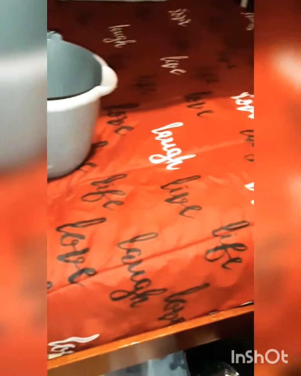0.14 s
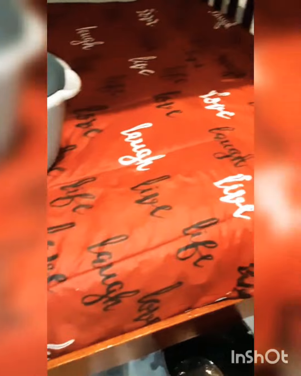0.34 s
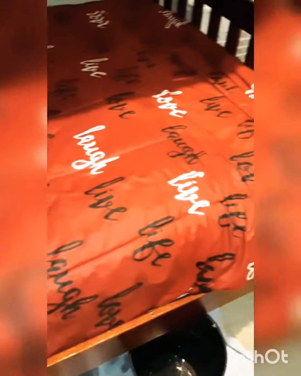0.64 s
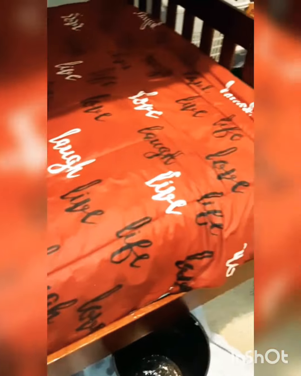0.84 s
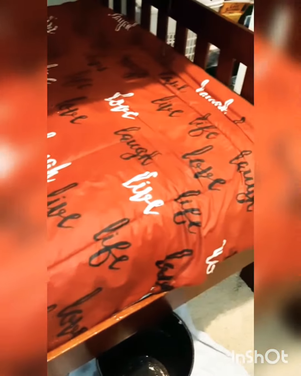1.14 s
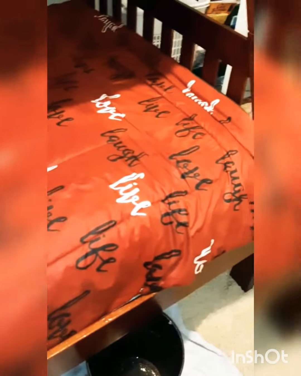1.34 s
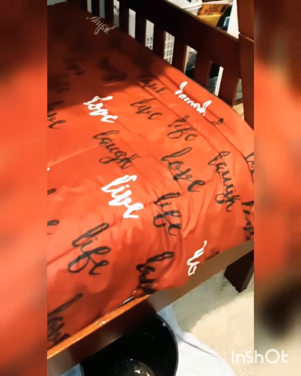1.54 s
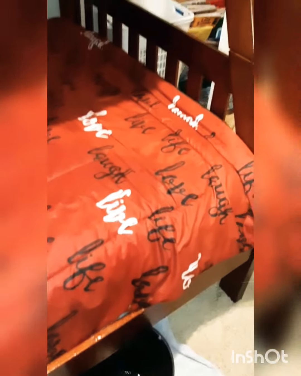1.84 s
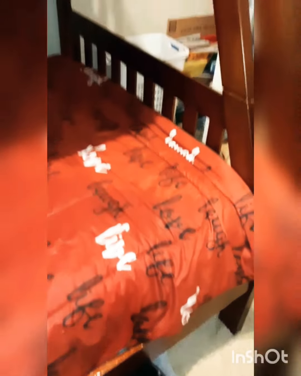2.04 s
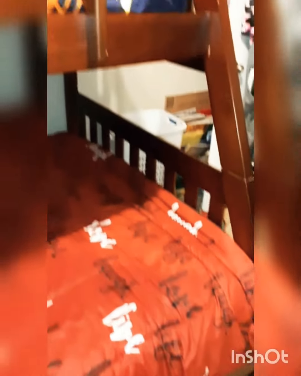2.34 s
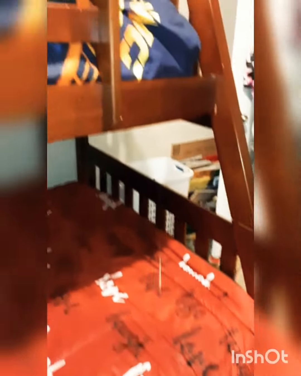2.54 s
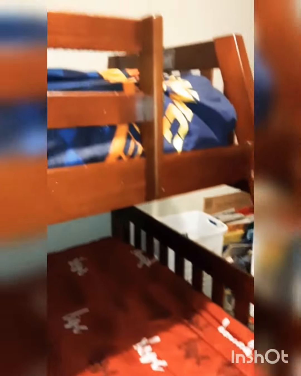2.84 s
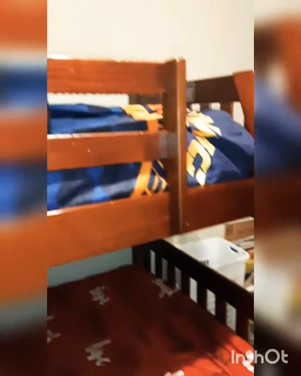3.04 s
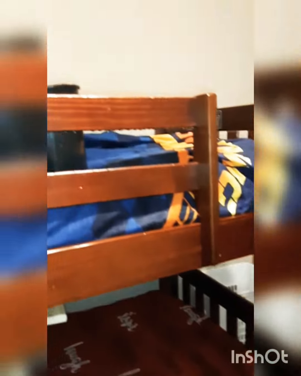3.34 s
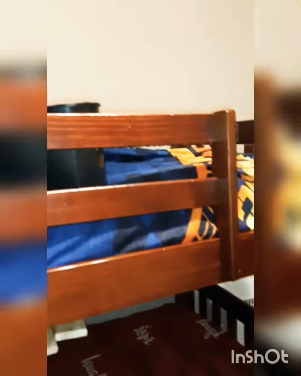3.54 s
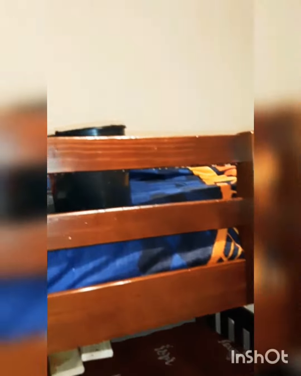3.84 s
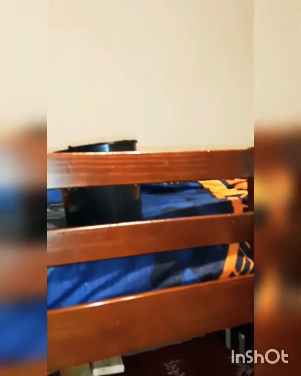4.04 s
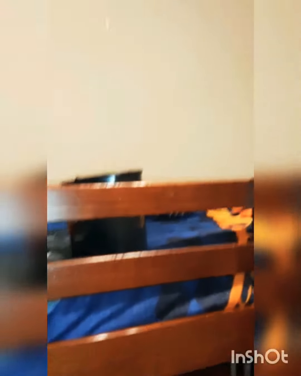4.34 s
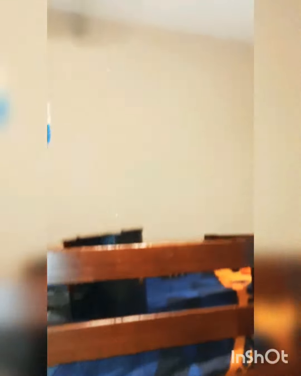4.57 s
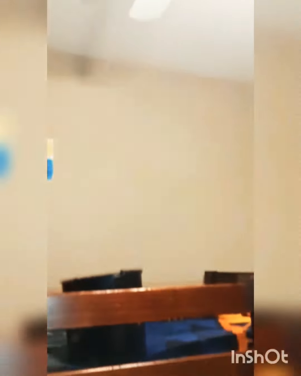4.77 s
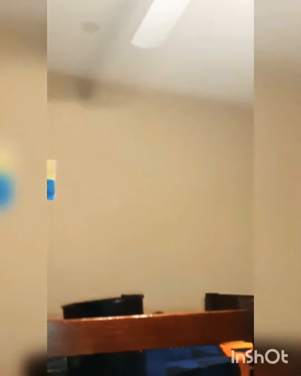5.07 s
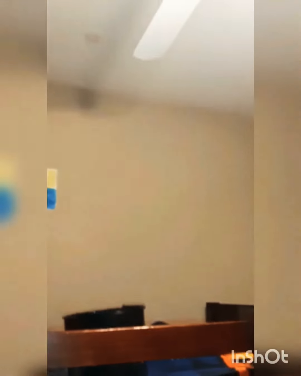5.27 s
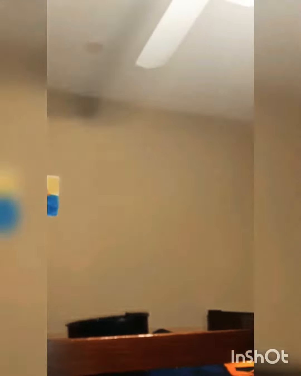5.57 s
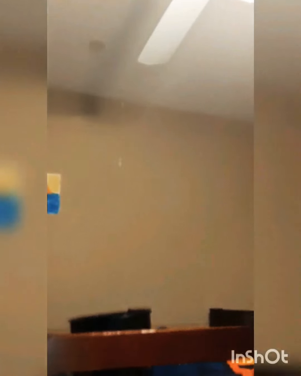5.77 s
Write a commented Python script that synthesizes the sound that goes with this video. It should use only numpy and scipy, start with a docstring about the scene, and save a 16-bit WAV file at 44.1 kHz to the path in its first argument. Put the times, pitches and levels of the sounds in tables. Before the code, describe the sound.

Water drips quickly and unevenly into plastic buckets in a small room, with sharp splashes, bubbly plinks and light ticks.

```python
"""A small bedroom with a leaking ceiling, plastic buckets under the drips, a stereo microphone in the hand.
Drops slap the water in quick, uneven succession and throw up spray; some tick on bare plastic.
Many trap an air bubble that rings and glides upward. The air in the bucket colours every drop,
and the walls answer with a short tail. A few dull knocks and close, dry taps sound over a faint hush."""
import sys
import numpy as np
from scipy import signal
from scipy.fft import rfft, irfft, next_fast_len
from scipy.io import wavfile

SR = 44100
rng = np.random.default_rng(int(sys.argv[2]) if len(sys.argv) > 2 else 0)


def bounce(signal):
    """Save signal as a 16-bit WAV file at the path given by the first command-line argument."""
    frames = np.transpose(np.atleast_2d(signal))
    limited = np.clip(frames, -1, 1)
    pcm = np.round(limited * 32767).astype(np.int16)
    wavfile.write(sys.argv[1], SR, pcm)


N = 260631
CUTOFF_HZ = 16000
ROOMY_DB, CLOSE_DB = -12.5, -0.5   # direct sound: mostly room, or almost straight into the microphone


def from_db(db):
    """Decibels to gain."""
    return 10 ** (np.asarray(db) / 20)


def unit_energy(x):
    """Scale to a mean energy of 1 per channel."""
    return x / np.sqrt(np.mean(np.sum(x ** 2, axis=-1)) + 1e-20)


def seconds(length):
    """A time axis."""
    return np.arange(int(length * SR)) / SR


def band(x, hz, octaves):
    """Band-pass around a centre."""
    edges = [hz / 2 ** (octaves / 2), min(hz * 2 ** (octaves / 2), CUTOFF_HZ)]
    return signal.sosfilt(signal.butter(3, edges, "band", fs=SR, output="sos"), x + 1e-18)


def coloured(x, spectrum):
    """Apply a smooth curve of (frequency [Hz], gain [dB])."""
    hz, db = np.transpose(spectrum)
    size = next_fast_len(N + SR // 10)
    log_hz = np.log(np.arange(size // 2 + 1) * SR / size + 1)
    gain = from_db(np.interp(log_hz, np.log(hz), db))
    return irfft(rfft(x, size) * gain, size)[:, :N]


def balance(hz):
    """Where water of this pitch sits in the stereo picture, as left-right dB."""
    # balance at the microphone: (pitch [Hz], left-right [dB])
    balance_by_pitch = [(500, 6.5), (800, -0.5), (1400, -1.5), (2600, -4), (4200, -2), (8000, -0.5),
                        (12000, -0.5)]
    pitches, db = np.transpose(balance_by_pitch)
    return np.interp(np.log(hz), np.log(pitches), db)


def room_path(s, direct_db=ROOMY_DB, early_t60_s=.12, late_t60_s=.4, build_up_s=.00048, wide_above_hz=690):
    """From one spot to the microphone at time s: direct sound, uneven near reflections, room tail."""
    # the microphone turns away from the buckets and back: (time [s], lead of the left channel [ms])
    left_lead = [(0, 0.58), (2.2, .45), (2.7, 0.35), (3.3, 0.16), (3.8, 0.082), (4.7, 0.044), (5.3, .35),
                 (5.9, 0.33)]
    t = seconds(.25)
    early = from_db(-5) * unit_energy(from_db(-60 * t / early_t60_s))
    late = from_db(-8) * unit_energy(from_db(-60 * t / late_t60_s))
    fade = np.hypot(early, late) * (1 - np.exp(-t / build_up_s))
    # reflections arrive in clumps about a millisecond long
    clumps_db = 9.5 * np.repeat(rng.uniform(-1, 1, len(t)), SR // 1000)[:len(t)]
    fade *= unit_energy(from_db(clumps_db)) * np.sqrt(len(t))
    # long waves reach both capsules alike, short ones differ
    left, other = rng.standard_normal((2, len(t)))
    hz = np.arange(len(t) // 2 + 1) * SR / len(t)
    alike = np.exp(-(hz / wide_above_hz) ** 2)
    right = irfft(alike * rfft(left) + np.sqrt(1 - alike ** 2) * rfft(other), len(t))
    response = np.array([left, right]) * fade
    lead = int(np.interp(s, *np.transpose(left_lead)) * SR / 1000)
    response[[0, 1], [0, lead]] += from_db(direct_db)
    return response


def play(events, voice, direct_db=ROOMY_DB):
    """Sound each event from a spot of its own; its level is that of its energy spread over 10 ms."""
    out = np.zeros((2, N))
    for s, db, hz, octaves, swell_s, pan_db in events:   # octaves: a splash's width or a bubble's rise
        sound = voice(hz, octaves, swell_s)
        left, right = signal.fftconvolve(room_path(s, direct_db), sound[None], axes=1)
        pan = from_db([[pan_db / 2], [-pan_db / 2]])
        heard = unit_energy(np.array([unit_energy(left), unit_energy(right)]) * pan)
        start = int(s * SR)
        heard = heard[:, :max(N - start, 0)]
        out[:, start:start + heard.shape[1]] += from_db(db) * np.sqrt(SR / 100) * heard
    return out


def room_tone(level_db=-60, side_db=-6):
    """The faint, steady hush of the bedroom."""
    # spectrum of the hush: (frequency [Hz], relative density [dB])
    hush_spectrum = [(25, -18), (55, -5), (125, 1.5), (200, -8), (400, -14.5), (800, -27.5), (2500, -6),
                     (8000, -13), (11000, -11.5), (15000, -9)]
    mid, side = rng.standard_normal((2, N))
    hush = coloured(mid + from_db(side_db) * side * [[1], [-1]], hush_spectrum)
    return from_db(level_db) * np.sqrt(N) * unit_energy(hush)


def splash(hz, octaves, swell_s, snaps_per_s=900, spread_db=5, slap_db=12.5):
    """A drop tears the surface: one slap amid a quick cluster of tiny snaps and a wet wash."""
    age = seconds(7 * swell_s + 6 / hz) / swell_s
    born = rng.random(len(age)) < snaps_per_s / SR
    snaps = born * from_db(spread_db * rng.standard_normal(len(age))) * rng.choice([-1, 1], len(age))
    snaps[int(swell_s * SR)] = from_db(slap_db)
    wash = .044 * rng.standard_normal(len(age))
    return band((snaps + wash) * age * np.exp(-age), hz, octaves)


def patter(per_s=8, level_db=-47, spread_db=5.5, low_hz=2970, high_hz=11100, width_oct=1.95):
    """Light drops: a steady leak lets go at uneven moments, each with its own strength, pitch and length."""
    events = []
    for slot, (late, strong, high, slow) in enumerate(rng.random((int(per_s * N / SR), 4))):
        db = level_db + spread_db * (2 * strong - 1)
        hz = low_hz * (high_hz / low_hz) ** high
        swell_s = .003 * 2 ** (2 * slow - 1)
        events.append(((slot + late) / per_s, db, hz, width_oct, swell_s, balance(hz)))
    return events


def drops(tick_hz=11950, tick_width_oct=1.55, tick_swell_s=.0054):
    """Heavy drops slap the water, light ones patter between them, and some tick brightly on plastic."""
    # heavy drops on water: (time [s], level [dB], centre [Hz], width [octaves], swell [s])
    water_hits = [(.026, -39.5, 6150, 2.95, .011), (.077, -45, 8750, 2.2, .0012),
                  (.107, -42, 9600, 2.4, 0.0052), (.183, -36, 7300, 1.5, .004),
                  (.375, -44, 9360, 2.6, .001), (.222, -44, 3520, 1.04, 0.0017),
                  (.272, -48.5, 5230, 0.89, .004), (.319, -49, 8950, 0.3, .007),
                  (0.407, -43, 7200, 1.3, 0.0055), (0.473, -44, 2470, .6, 0.028),
                  (.51, -41.5, 8900, 2.2, 0.0063), (.529, -41.5, 2020, 0.86, 0.0017),
                  (.58, -39.5, 7260, 1.05, 0.004), (0.739, -43, 3900, 2.6, 0.021),
                  (0.836, -39.5, 9450, 3.44, 0.0033), (0.92, -44, 5740, 1.2, 0.0099),
                  (.976, -37, 5800, 1.38, 0.0061), (1.035, -44.5, 4140, 1.1, 0.0019),
                  (1.067, -45, 4800, 2.9, 0.0016), (1.163, -43, 4800, 1.9, 0.011),
                  (1.247, -39.5, 4700, 2.25, 0.0027), (1.302, -44.5, 5900, 1.1, 0.0034),
                  (1.362, -44, 1850, 2.06, 0.016), (1.386, -35, 4960, 2.06, 0.0065),
                  (1.509, -43, 3020, 4.3, .004), (1.61, -42.5, 4130, 1.29, 0.015),
                  (1.67, -43, 4814, 1.53, 0.025), (1.819, -42, 3600, 2.85, 0.0071),
                  (1.925, -36.5, 3696, 2.4, .0055), (2.057, -42, 4614, 1.88, .008),
                  (2.188, -45, 6200, 1.45, 0.0024), (2.229, -41.5, 4425, 3.86, 0.0049),
                  (2.289, -43, 5793, 0.86, 0.0041), (2.354, -40, 5000, 1.09, .0022),
                  (2.416, -41.5, 1170, 4.1, 0.011), (2.419, -37.5, 8200, 0.97, 0.0053),
                  (2.509, -43, 4930, 2.88, 0.019), (2.638, -36.5, 3405, 3.3, 0.0052),
                  (2.728, -43, 5596, 2.83, 0.011), (2.81, -39.5, 7070, 1.24, .015),
                  (2.96, -38, 5578, 1.9, 0.015), (3.065, -37, 4650, 1.29, .0052),
                  (3.135, -40.5, 2650, 2.17, 0.012), (3.234, -41, 5172, 1.93, 0.0045),
                  (3.317, -37.5, 3200, 1.4, 0.0055), (3.443, -48.5, 3000, 1.87, 0.019),
                  (3.529, -40.5, 4363, 3.27, 0.0085), (3.68, -42.5, 3900, 1.9, .01),
                  (3.766, -40, 3195, 1.36, 0.018), (3.816, -40, 3990, 2.37, 0.0065),
                  (3.863, -35.5, 3800, 1.43, .015), (3.979, -40.5, 4050, 2.73, 0.0091),
                  (4.04, -38.5, 4798, 1.53, 0.0048), (4.073, -44.5, 1950, 2.4, .011),
                  (4.141, -43, 5976, 2.08, 0.0058), (4.16, -53, 1475, 1.89, 0.0067),
                  (4.236, -36, 3948, 0.99, 0.016), (4.261, -45, 1424, 1.7, .016),
                  (4.31, -42, 4214, 2.68, 0.0032), (4.353, -42, 3421, 3.2, 0.014),
                  (4.431, -40.5, 3715, 2.4, .006), (4.519, -42.5, 7884, 2.7, .006),
                  (4.571, -41.5, 7900, 1.26, 0.018), (4.608, -39.5, 2358, 1.16, .007),
                  (4.649, -43, 2463, 2.47, 0.0056), (4.724, -43.5, 1931, 1.76, .018),
                  (4.909, -40.5, 5000, 1.8, 0.0049), (5.011, -44, 4227, 0.98, 0.0078),
                  (5.097, -47, 2162, 3.06, 0.023), (5.129, -42.5, 9344, 1.1, 0.015),
                  (5.229, -41.5, 5400, 1.09, 0.0093), (5.246, -36.5, 1610, 1.05, .016),
                  (5.36, -40, 3635, 2.4, 0.0097), (5.451, -42, 3958, 1.54, 0.0089),
                  (5.537, -45.5, 2535, 4.2, 0.019), (5.602, -37.5, 4882, 0.61, 0.0078),
                  (5.638, -39.5, 4390, 1.4, 0.0071), (5.773, -47.5, 2157, 2.83, 0.017),
                  (5.821, -40, 3393, 1.56, 0.013), (5.88, -38.5, 12400, 3.05, 0.017)]
    # drops on bare plastic: (time [s], level [dB])
    plastic_hits = [(0.704, -48.5), (1.547, -43), (1.629, -43), (2.237, -37), (2.641, -43.5), (3.173, -44),
                    (3.47, -43.5), (3.763, -46.5), (3.872, -45.5), (4.102, -39.5), (4.197, -43.5),
                    (4.243, -34.5), (4.376, -44.5), (4.421, -43.5), (4.731, -43), (4.797, -41.5),
                    (4.961, -41), (5.021, -45.5), (5.462, -43), (5.606, -40.5), (5.828, -42.5)]
    heavy = [(s, db, hz, octaves, swell_s, balance(hz)) for s, db, hz, octaves, swell_s in water_hits]
    ticks = [(s, db, tick_hz, tick_width_oct, tick_swell_s, balance(tick_hz)) for s, db in plastic_hits]
    return play(heavy + patter() + ticks, splash)


def spray(splashes, per_s=170, level_db=-10.5, fall_s=.096, right_db=6.5, bands=12):
    """Droplets thrown up by the splashes fall back as tiny plinks, dying away in the lulls."""
    droplets = np.zeros((2, N))
    for hz in np.geomspace(2000, 14000, bands):
        born = rng.random(N) < per_s / bands / SR
        landings = np.zeros(N)
        landings[born] = from_db(rng.uniform(-20, 28, born.sum()))
        spot = room_path(rng.uniform(0, N / SR))
        plink = signal.fftconvolve(spot, splash(hz, octaves=.42, swell_s=3.985 / hz)[None], axes=1)
        droplets += signal.oaconvolve(landings[None], unit_energy(plink), axes=1)[:, :N]
    decay = np.exp(-1 / (fall_s * SR))
    power = np.mean(splashes ** 2, axis=0)
    usual = np.mean(power)
    stir = signal.lfilter([1 - decay], [1, -decay], power, zi=[usual])[0]   # the water is already astir
    envelope = np.sqrt(2 * usual * stir / (stir + usual))   # a big drop throws only a little more spray
    return from_db(level_db) * envelope * np.sqrt(N) * unit_energy(droplets * from_db([[0], [right_db]]))


def bucket(water, low_cut_hz=195):
    """The air above the water rings along with every drop; the small surface radiates no bass."""
    # air resonances of the bucket: (frequency [Hz], width [Hz], gain of the added ring [dB])
    air_modes = [(447, 8.4, -12), (777, 13.7, 4), (1125, 14.5, 1.5), (1270, 19, -61), (1540, 68, -1.5),
                 (2630, 350, -7)]
    out = signal.sosfilt(signal.butter(2, low_cut_hz, "high", fs=SR, output="sos"), water + 1e-18)
    for hz, width_hz, db in air_modes:
        out = out + from_db(db) * signal.lfilter(*signal.iirpeak(hz, hz / width_hz, fs=SR), out)
    return out


def knocks(thud_width_oct=.96, tap_hz=750, tap_width_oct=3.3, tap_swell_s=.00074):
    """Knocks and taps outside the bucket: the same burst as a splash, but low and dull or very short."""
    # soft, dull knocks: (time [s], level [dB], centre [Hz], swell [s], left-right [dB])
    dull_knocks = [(.035, -67.5, 269, .0047, 28), (0.899, -67, 85, .015, -21),
                   (2.019, -61.5, 280, 0.0073, -6), (3.221, -46.5, 67.6, 0.024, -25),
                   (3.289, -53, 70.6, 0.0244, -11), (3.629, -58, 293.8, 0.0049, 0),
                   (5.644, -57.5, 280, 0.0055, -1)]
    # small dry taps close to the microphone: (time [s], level [dB])
    close_taps = [(0.041, -60.5), (0.329, -72), (.352, -68), (1.019, -63), (2.021, -74), (2.731, -53)]
    thuds = [(s, db, hz, thud_width_oct, swell_s, pan_db) for s, db, hz, swell_s, pan_db in dull_knocks]
    taps = [(s, db, tap_hz, tap_width_oct, tap_swell_s, balance(tap_hz)) for s, db in close_taps]
    return play(thuds, splash) + play(taps, splash, CLOSE_DB)


def bubble(hz, rise_oct, ring_s):
    """A pocket of air rings, and its pitch climbs as it nears the surface."""
    age = seconds(8 * ring_s + .002) / ring_s
    pitch = hz * 2 ** (rise_oct * (.5 - np.exp(-age / 2)))
    return age * np.exp(-age) * np.sin(2 * np.pi * np.cumsum(pitch) / SR)


def gurgle(hz, rise_oct, swell_s, rise_share=.724, glide_oct=.24, scatter_oct=.244):
    """A long pocket of air breaks into a run of short bubbles that tend to get smaller and higher."""
    ring_s = .003 * np.sqrt(1000 / hz)
    count = int(np.clip(3 * swell_s / ring_s, 1, 16))
    if count < 4:   # a short pocket stays whole
        return bubble(hz, rise_oct, swell_s)
    out = np.zeros(int((8 * swell_s + 8 * ring_s + .004) * SR))
    for age in (np.arange(count) + rng.uniform(.2, .8, count)) * 4 / count:
        climb = rise_share * (.5 - np.exp(-age / 2))
        scatter = scatter_oct * rng.uniform(-1, 1)   # per octave of rise
        sound = bubble(hz * 2 ** (rise_oct * (climb + scatter)), glide_oct, ring_s)
        start = int(max(age * swell_s - 2 * ring_s, 0) * SR)
        out[start:start + len(sound)] += age * np.exp(-age) * sound
    return out


def with_rise(pockets, widest_hz=1187, rise_at_10ms_oct=1.147):
    """Add rise and balance: longer pockets climb further, those pitched away from widest_hz less."""
    events = []
    for s, db, hz, swell_s in pockets:
        by_length = (swell_s / .01) ** .21
        by_size = min(widest_hz / hz, hz / widest_hz) ** .57
        events.append((s, db, hz, rise_at_10ms_oct * by_length * by_size, swell_s, balance(hz)))
    return events


def trapped_air(bloop_rise_oct=.29, bloop_swell_s=.0055):
    """Air dragged under by the drops rings as gurgles, low bloops and a few clear plinks."""
    # single bubbles or short gurgles: (time [s], level [dB], mid pitch [Hz], swell [s])
    pockets = [(.136, -53, 940, 0.014), (.153, -45.5, 3310, 0.0045), (.183, -47.5, 1177, .012),
               (.184, -42, 2980, 0.0082), (.223, -53.5, 1100, 0.0085), (.503, -47, 1621, 0.011),
               (1.166, -41.5, 2970, 0.0038), (1.195, -59, 1203, .006), (1.303, -50.5, 489.4, .02),
               (1.391, -38, 4673, 0.0028), (1.415, -46.5, 957, 0.013), (1.452, -48.5, 1240, .0011),
               (1.544, -52.5, 1220, 0.015), (1.661, -54.5, 1504, 0.0069), (1.839, -52.5, 1701, 0.0095),
               (1.888, -51.5, 949, 0.012), (1.933, -46.5, 1220, 0.0022), (2.0, -49.5, 2320, .018),
               (2.241, -47, 1800, 0.0057), (2.436, -40.5, 743, 0.0047), (2.412, -45.5, 3425, 0.0055),
               (2.437, -43, 3000, 0.0063), (2.479, -55, 1070, 0.00064), (2.53, -40, 3492, .0086),
               (2.675, -49, 1030, .018), (2.767, -48.5, 1944, 0.014), (2.952, -49, 718.8, 0.012),
               (2.973, -46.5, 1090, 0.0094), (3.006, -41.5, 1330, 0.0076), (3.083, -55, 1200, .011),
               (3.118, -35.5, 2602, 0.0058), (3.168, -49.5, 740, 0.017), (3.216, -51.5, 1080, 0.017),
               (3.373, -59, 782, .018), (3.53, -44.5, 2521, 0.004), (3.56, -57.5, 772, 0.021),
               (3.873, -35.5, 4133, 0.0028), (3.937, -47, 951, 0.011), (4.033, -54, 823, 0.014),
               (4.057, -47.5, 2926, .0011), (4.101, -40.5, 3587, 0.0058), (4.238, -34.5, 2510, 0.0058),
               (4.237, -46, 746, .016), (4.43, -42, 2553, 0.0078), (4.432, -52, 1081, 0.0077),
               (4.612, -35, 2703, 0.011), (4.692, -58, 995, .018), (4.729, -43.5, 1081, .004),
               (4.743, -44.5, 1430, 0.00093), (4.81, -47, 2556, 0.0056), (4.854, -41.5, 2505, 0.0041),
               (4.958, -49, 2452, 0.0076), (5.128, -40, 2570, 0.0068), (5.156, -51.5, 710, 0.018),
               (5.32, -43, 1190, .018), (5.324, -45, 2890, 0.0068), (5.414, -43.5, 3120, 0.0042),
               (5.462, -47, 1229, .0062), (5.605, -43, 2690, 0.0083), (5.693, -46, 2171, 0.0072),
               (5.796, -41, 2820, .004), (5.879, -52.5, 682.4, 0.012)]
    # deep pockets that ring at an almost level pitch: (time [s], level [dB], pitch [Hz])
    deep_pockets = [(.145, -56.5, 848), (.683, -57.5, 808), (.704, -57.5, 779), (1.406, -51.5, 724),
                    (3.205, -50, 729), (4.172, -57.5, 615), (5.184, -57.5, 786), (5.39, -52.5, 820)]
    # plinks that reach the microphone almost directly: (time [s], level [dB], mid pitch [Hz], swell [s])
    plinks = [(.477, -49.5, 2220, .0028), (2.262, -42, 2313, 0.0061), (2.859, -39.5, 2446, 0.0032)]
    bloops = [(s, db, hz, bloop_rise_oct, bloop_swell_s, balance(hz)) for s, db, hz in deep_pockets]
    return play(with_rise(pockets), gurgle) + play(bloops, bubble) + play(with_rise(plinks), bubble, CLOSE_DB)


def scene():
    """Splashes, bubbles and spray in the bucket, with a few knocks and taps, over the quiet room."""
    splashes = drops()
    water = splashes + trapped_air() + spray(splashes)
    return bucket(water) + knocks() + room_tone()


def record(dry):
    """The hand-held microphone brings the midrange forward and cuts the very top steeply."""
    # microphone colour: (frequency [Hz], gain [dB])
    microphone = [(100, -3), (450, 5.5), (760, 9), (1100, 6.5), (1800, 4), (2600, 2), (4500, 2.5),
                  (6500, 0), (7600, 1.5), (8800, -7), (10500, -1.5), (12500, 1.5), (15500, -0.5)]
    top_cut = signal.ellip(12, .1, 80, CUTOFF_HZ, fs=SR, output="sos")
    return signal.sosfilt(top_cut, coloured(dry, microphone))


dry = scene()
out = record(dry)
bounce(out)
```